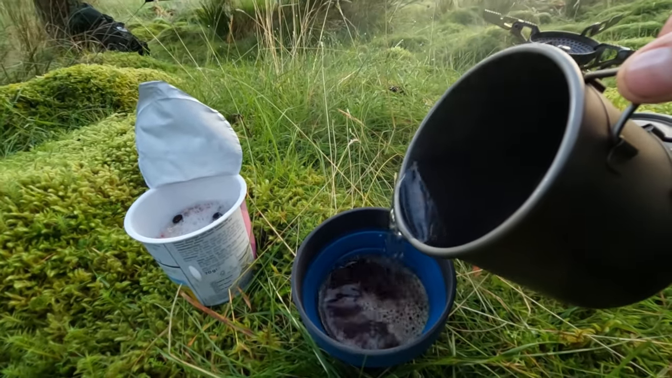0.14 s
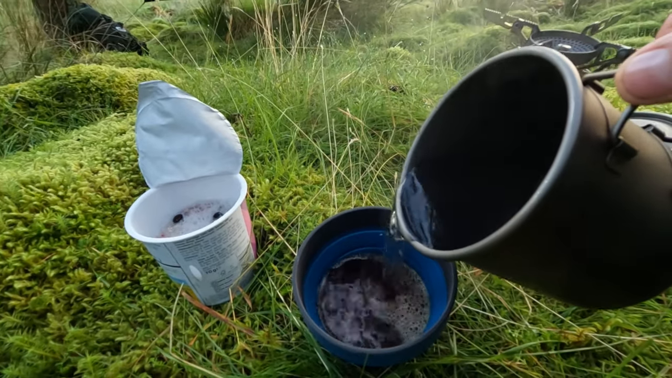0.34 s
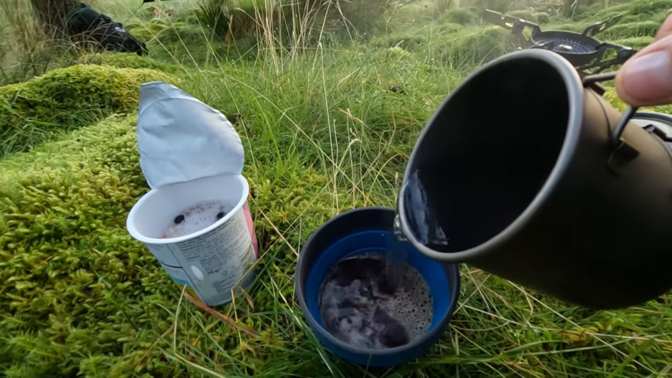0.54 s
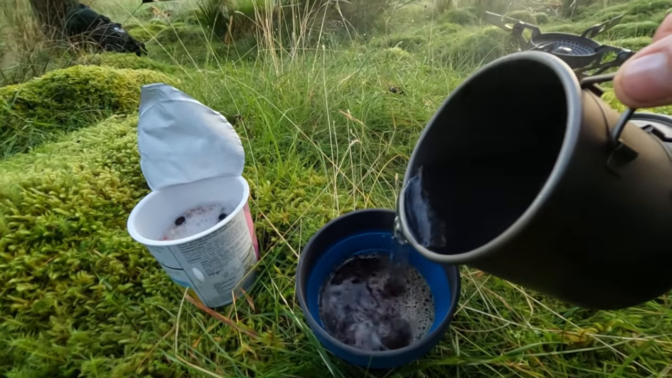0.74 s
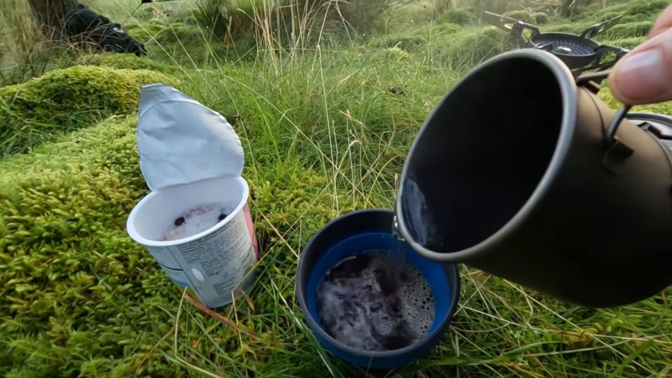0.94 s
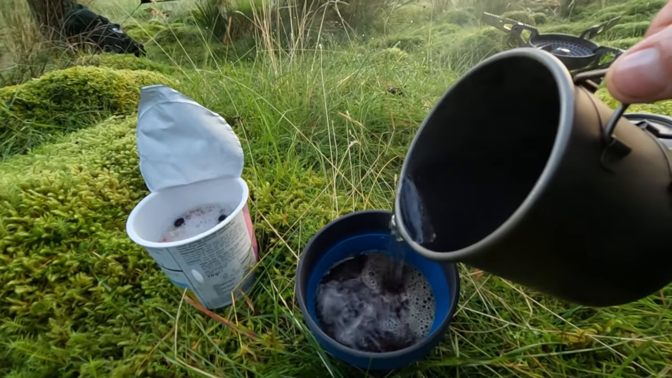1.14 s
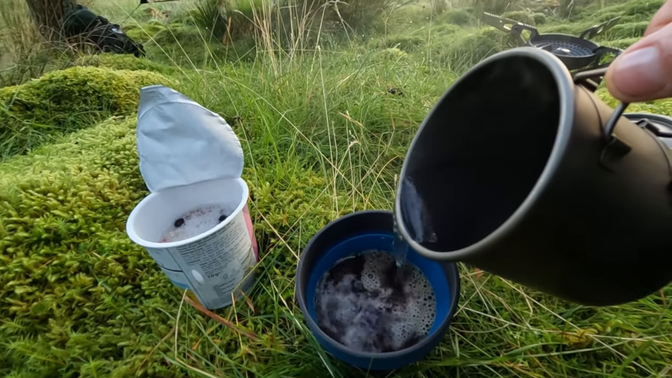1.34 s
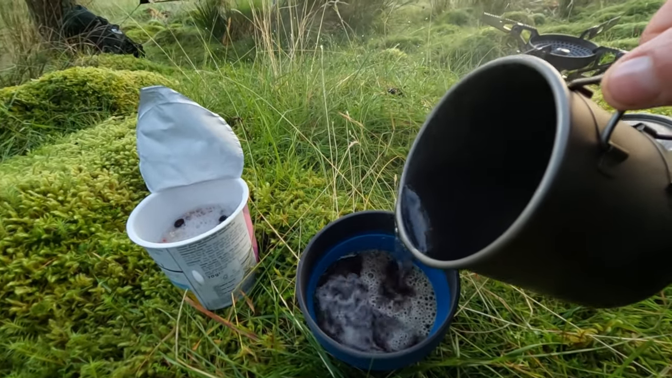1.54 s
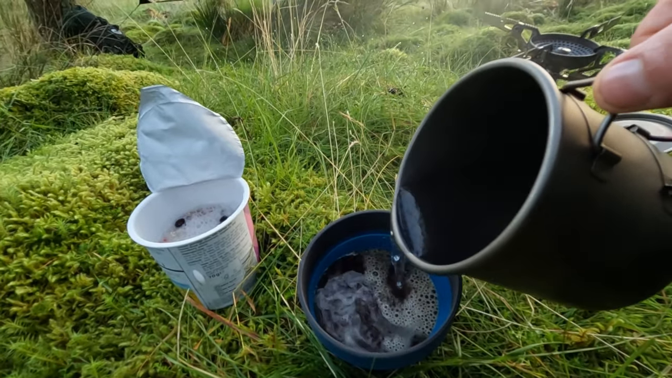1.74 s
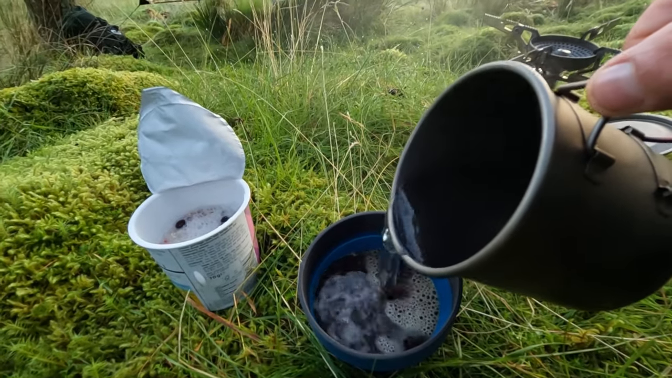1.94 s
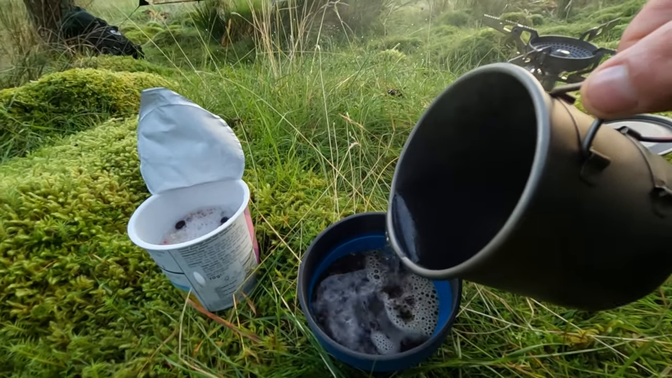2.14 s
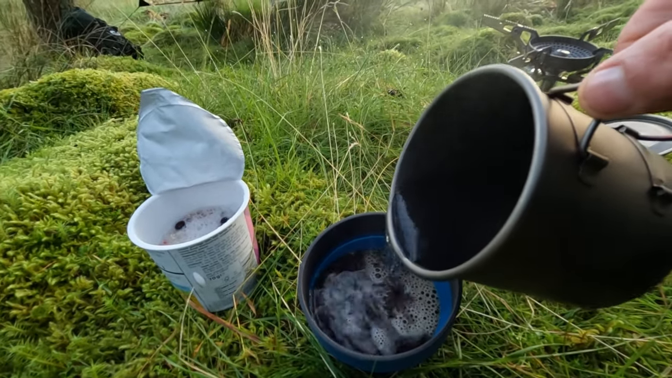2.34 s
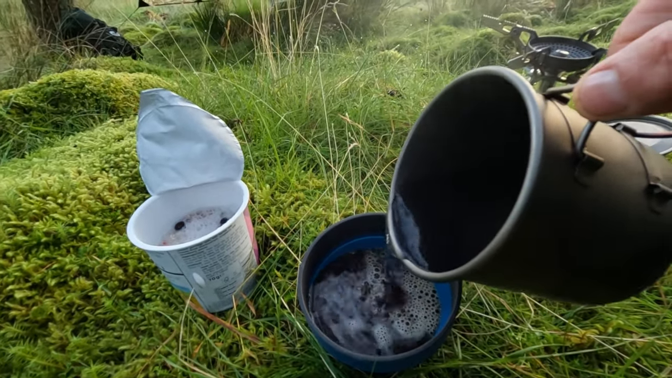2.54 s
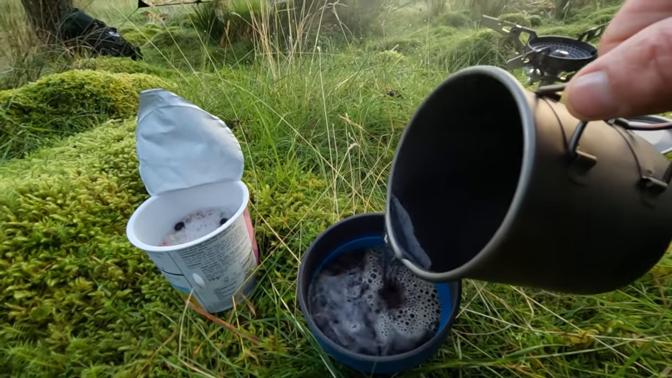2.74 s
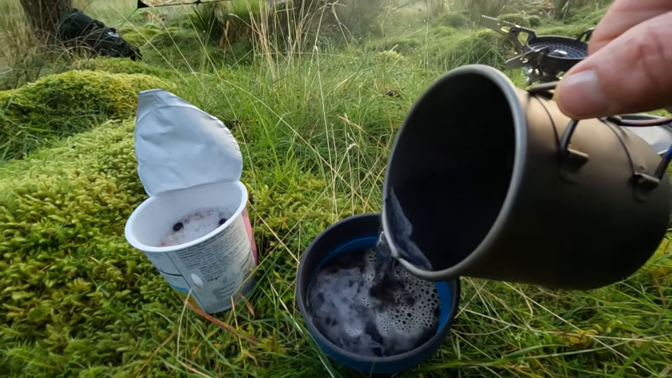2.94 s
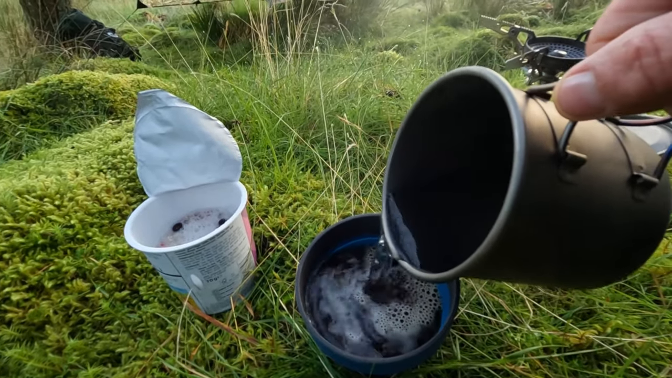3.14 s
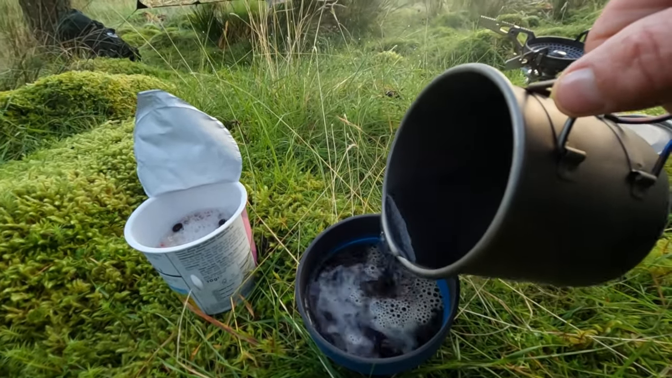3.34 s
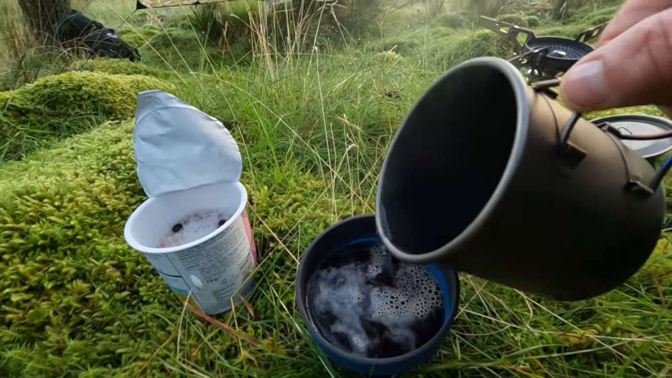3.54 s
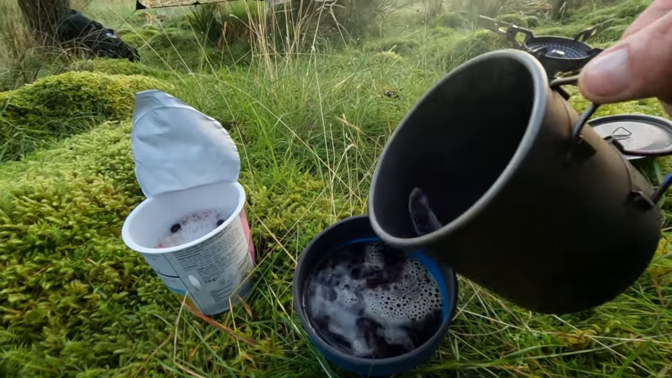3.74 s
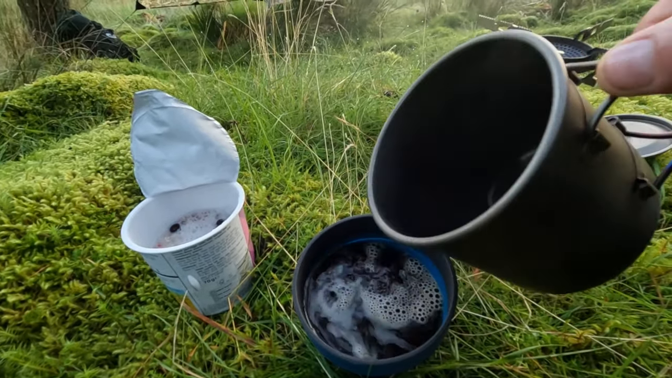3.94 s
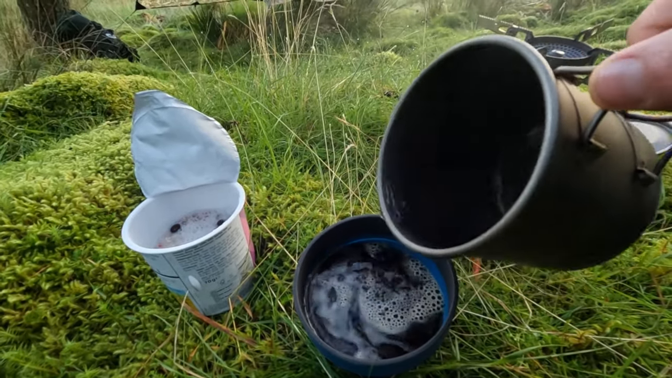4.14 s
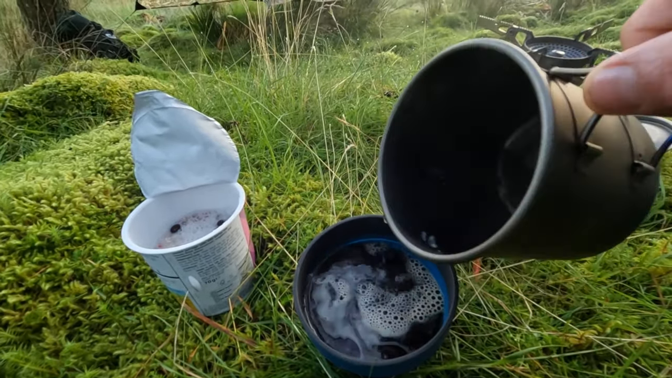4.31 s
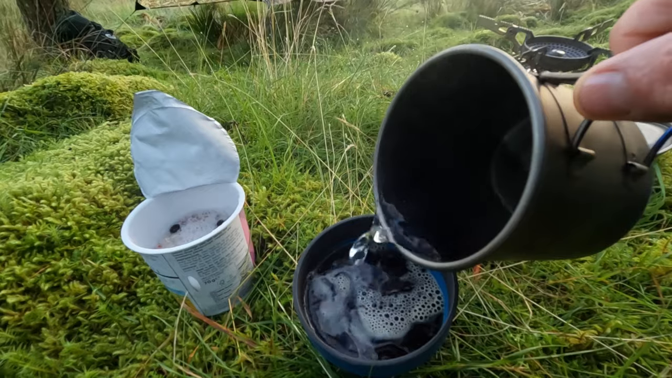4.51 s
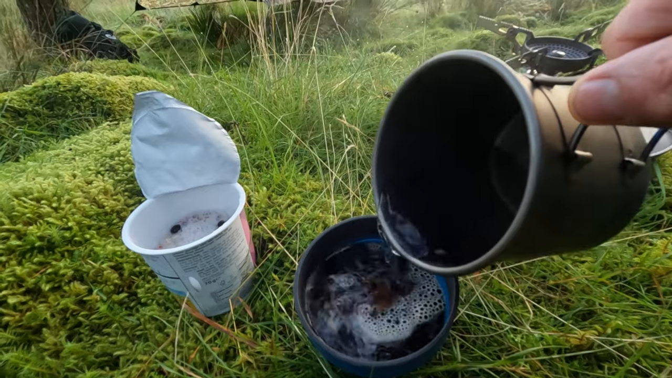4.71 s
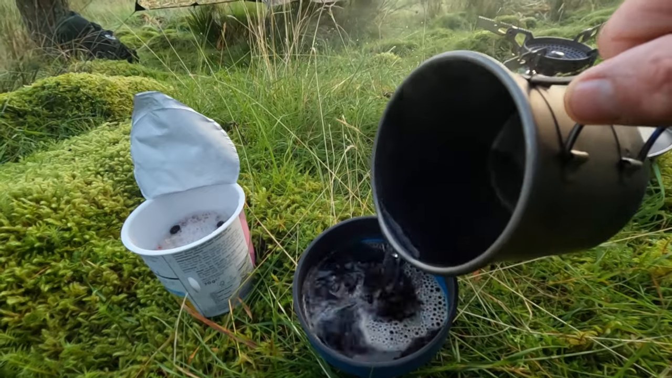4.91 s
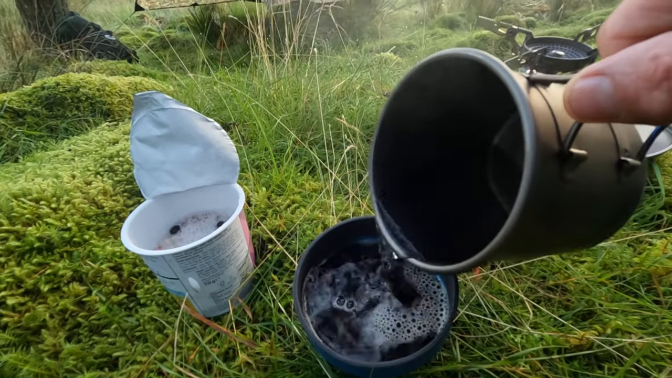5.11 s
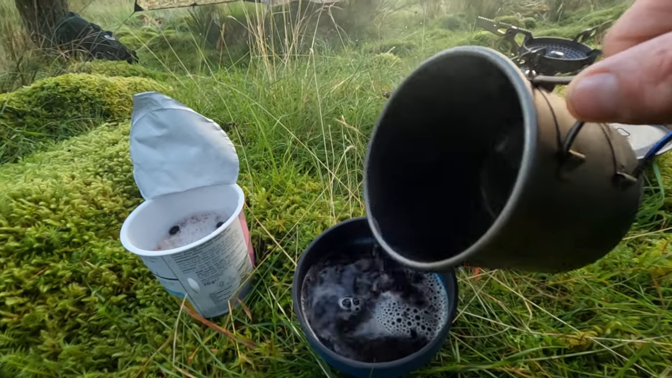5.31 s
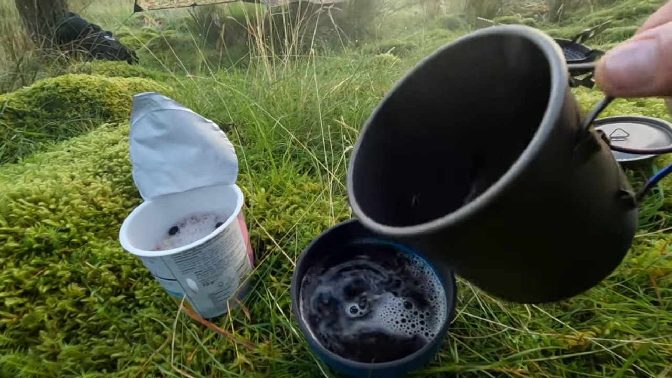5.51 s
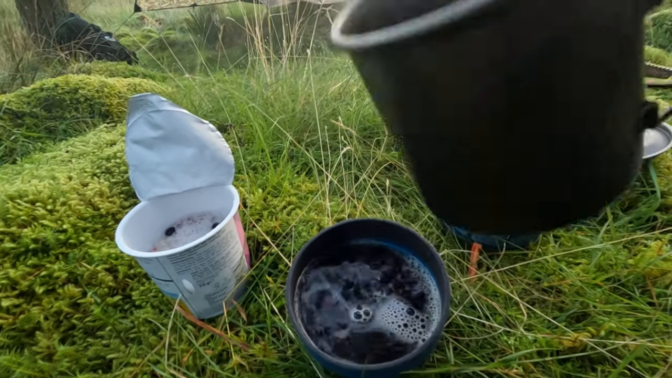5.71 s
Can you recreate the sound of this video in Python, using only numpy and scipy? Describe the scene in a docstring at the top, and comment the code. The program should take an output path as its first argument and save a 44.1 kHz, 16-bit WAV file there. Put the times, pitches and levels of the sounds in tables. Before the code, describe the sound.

Close up on a quiet hillside, an uneven trickle of water plops and gurgles into a cup of coffee, its hollow tone rising slightly as the cup fills. Soft puffs of wind brush the microphone early on. After a brief gap with faint drips, a second, shorter pour splashes in. The froth fizzes gently, and the thin metal pot lands with a light scraping clink.

```python
"""Hot water dribbles from a small metal pot into a plastic cup of coffee standing in moss, in two close pours.
Each gulp of the broken stream slaps the surface, traps a bubble that rings for a few cycles and booms the
air in the cup. Lighter drops and splashes fall between the gulps, the froth ticks, and at the end the pot
is set down with a scrape and a ring. The hillside hushes far off and a breeze brushes the microphone."""
import sys
import numpy as np
from scipy import signal
from scipy.fft import rfft, irfft, next_fast_len
from scipy.io import wavfile
from scipy.ndimage import uniform_filter1d, map_coordinates

SR = 44100
rng = np.random.default_rng(int(sys.argv[2]) if len(sys.argv) > 2 else 0)


def wav_out(sig):
    """Save sig, one row per channel (or a flat mono array), as 16-bit PCM at SR to the path in sys.argv[1]."""
    wavfile.write(sys.argv[1], SR, np.round(np.clip(np.atleast_2d(sig).T, -1, 1) * 32767).astype(np.int16))


N = 258426

# The big plops: start_s, level_db, pitch_hz, boom_offset_db, slap_offset_db, ring_cycles
GULPS = [(0.012, -23, 1710.0, -13.5, -28, 4.2), (0.0383, -21.5, 2130, -44, -23, 4.3),
         (0.0607, -23, 1490, -11.5, -9.5, 4.9), (0.0731, -27, 2460.0, -14.5, -49, 6.8),
         (0.1392, -26, 1360, -15, -39, 6.7), (0.151, -26, 1660.0, -10, -19, 6.5),
         (0.1578, -26, 1350, -11.5, -21, 8.7), (0.171, -21.5, 1430, -13, -27, 3.7),
         (0.1922, -27.5, 1620.0, -15, -15, 5.2), (0.2208, -19.5, 2150, -44, -25, 3.1),
         (0.3231, -21.5, 1526, -16, -21, 3.6), (0.355, -22.5, 2080.0, -19, -20, 2.5),
         (0.3685, -27.5, 1770.0, -44, -15, 7.5), (0.4842, -30.5, 1490.0, -11, -28, 4.6),
         (0.5443, -31.5, 1530, -8, -14, 5.8), (0.593, -27.5, 1780.0, -13, -14, 2.4),
         (0.6264, -28.5, 1900.0, -44, -10.5, 2.4), (0.6752, -28.5, 1560, -26, -18, 9.1),
         (0.6998, -20.5, 1370, -10, -23, 5.9), (0.7244, -24.5, 1610, -7, -36, 5.2),
         (0.7677, -17.5, 2030, -22, -25, 3.6), (0.8171, -22.5, 1860.0, -16.5, -26, 2.14),
         (0.9, -28, 1670.0, -13, -15, 4.8), (0.9122, -29.5, 1872, -11, -17, 21),
         (0.981, -28, 1640.0, -9, -19, 3.2), (1.0346, -29.5, 1430, -9.5, -8, 7.1),
         (1.0542, -22, 2260.0, -44, -29, 2.5), (1.106, -16.5, 2510, -18.5, -16.5, 4.8),
         (1.174, -24.5, 1610, -16, -16, 3.2), (1.353, -24, 1440, -23, -37, 6.8),
         (1.6003, -34, 1460.0, -44, -9, 7.1), (1.7119, -29, 1370.0, -18, -8.5, 14),
         (1.8224, -20.5, 1800, -13.5, -21, 5.4), (1.87, -28, 1690, -46, -18, 4.7),
         (1.8954, -23, 1416, -8, -14, 15), (1.9157, -18, 2000.0, -21, -24, 3.9),
         (2.0056, -25, 1470, -16, -26, 10.9), (2.0177, -25.5, 1640, -15, -22, 9.5),
         (2.157, -26, 2050.0, -44, -21, 3.6), (2.1816, -16, 1820, -18, -33, 4.2),
         (2.208, -27, 1770, -44, -21, 6.5), (2.2807, -17.5, 1750, -20, -28, 5.9),
         (2.2891, -22.5, 1760.0, -22, -25, 8), (2.6135, -26.5, 1970, -44, -26, 9.8),
         (2.8387, -24.5, 2000.0, -42, -20, 2.2), (2.9682, -24, 2210, -44, -37, 6.5),
         (3.023, -22, 2230.0, -20, -17, 2.96), (3.1835, -15.5, 2350, -36, -38, 2.6),
         (3.2144, -27, 1730, -18, -40, 18), (3.2573, -26.5, 2030, -17, -49, 8.2),
         (3.3207, -26, 1670.0, -21, -49, 12.9), (3.3997, -25.5, 1930.0, -26, -18, 9.3),
         (3.4219, -28.5, 2000.0, -16, -49, 7), (3.4326, -23, 1720, -23, -34, 10.5),
         (3.4459, -18, 1960, -21, -26, 4.3), (3.4722, -20, 1740, -25, -28, 8.4),
         (3.5313, -28.5, 1740, -28, -27, 15), (3.6396, -29, 1990, -44, -22, 10),
         (3.648, -26, 2045, -44, -23, 12), (3.6745, -22.5, 1700, -15, -26, 7.9),
         (3.7017, -12, 1920, -28, -13.5, 6.2), (3.7218, -15.5, 2060.0, -20, -18, 4),
         (3.7639, -10, 1680, -23, -21.5, 7.5), (4.6737, -21, 4670, -44, -19, 36),
         (4.693, -2.5, 1560, -9, -21.5, 2.3), (4.7074, -23.5, 2370, -30, -10.5, 7.1),
         (4.714, -35, 1850, -44, -1, 11.5), (4.7312, -34, 3970, 0, -8, 21),
         (4.7395, -27.5, 1720.0, -44, -8, 7.3), (4.7676, -22, 2170, -44, -11, 17.4),
         (4.779, -29, 2020.0, -44, -7, 8.4), (4.7854, -29, 1910.0, -44, -9, 5.7),
         (4.805, -17, 1990, -38, -27, 12), (4.8272, -12.5, 2380, -33, -19, 5.3),
         (4.8964, -17.5, 1680, -24, -23, 11.7), (4.9721, -9.5, 2280, -14.5, -18, 7),
         (4.9819, -25.5, 2190.0, -28, -16, 18), (5.0001, -19, 1740, -44, -19, 9.4),
         (5.0295, -27, 2100.0, -44, -16, 5.0), (5.0487, -27, 2400.0, -23, -18, 9.0),
         (5.0677, -26, 2110, -44, -17, 22), (5.0815, -19.5, 1970, -44, -29, 10),
         (5.1104, -27.5, 2590.0, -44, -15, 7.3), (5.1263, -22, 2100, -36, -26, 9.4),
         (5.1365, -30, 2370.0, -44, -28, 6.4), (5.1797, -16.5, 1900, -34, -32, 10.4),
         (5.1982, -23, 2270, -32, -35, 12), (5.2396, -17, 1830, -30, -56, 8.8),
         (5.2926, -17.5, 1460, -15, -40, 6.6), (5.3127, -26, 2250, -18, -26.5, 20),
         (5.3334, -25, 1560, -44, -11.5, 5.3), (5.3601, -19, 1700, -44, -20, 9.3),
         (5.3992, -11.5, 1490, -37, -35, 13.3), (5.4162, -17, 1900, -30, -16.5, 14),
         (5.4323, -11.5, 1730, -28, -23, 8.4), (5.45, -24, 2030, -44, -19, 11),
         (5.4672, -17.5, 2270, -46, -18, 8.6)]
# Boom of the air above the coffee, rising as the cup fills: time_s, pitch_hz
CUP_AIR = [(0, 564), (4.7, 747), (5.86, 710)]
# The cup's hollow note: time_s, pitch_hz, offset_db
HOLLOW_NOTE = [(0, 1183, -2.5), (2.2, 1263, -7.5), (5.86, 1300, -4)]
# Bright EQ for the slaps and the froth's hiss: freq_hz, gain_db
SPLASH_EQ = [(300, -23), (2200, 12.5), (4800, 0), (6000, -5), (7100, -2), (8000, -12), (12000, -16.5),
             (16000, -9)]


def gulps():
    """Each gulp slaps, pushes the surface, traps a ringing bubble and sets the cup booming."""
    start_s, level_db, pitch_hz, boom_db, slap_db, cycles = np.transpose(GULPS)
    glide_jitter, pitch_jitter, level_jitter = rng.standard_normal((len(start_s), 3)).T
    ring = bubbles(pitch_hz, np.maximum(cycles, 1) / pitch_hz, glide=-0.2 + 0.12 * glide_jitter)
    t = np.arange(ring.shape[1]) / SR

    spray = rng.standard_normal(ring.shape) * decay(t, t60_s=0.01)
    spray = signal.sosfilt(signal.butter(3, 3500, fs=SR, output="sos"), spray)  # heavy drops: dull
    push_s = 0.000085
    push = 0.49 * np.e * t / push_s * np.exp(-t / push_s)
    cushion = amp(-1.5 * start_s)[:, None]  # building froth softens the push and the spray
    body = in_cup(placed(start_s, level_db, ring + cushion * (push + 0.37 * spray)))

    air_hz = np.interp(start_s, *np.transpose(CUP_AIR))
    boom = bubbles(air_hz, 11 / air_hz) * attack(t, rise_s=0.00042)
    tail = amp(-24.5) * decay(t, t60_s=0.099) * np.sin(2 * np.pi * 952 * t)
    booms = placed(start_s, level_db + boom_db, boom + tail)
    booms = filtered(booms, lambda hz: highpass(hz, 350) ** 2)

    note_hz, note_db = (curve[(start_s * SR).astype(int)] for curve in curves(HOLLOW_NOTE))
    note_hz = note_hz * np.exp(0.029 * pitch_jitter)
    note_db = level_db + note_db + 0.44 * boom_db + 2 * level_jitter  # more boom, more hollow note
    notes = placed(start_s, note_db, bubbles(note_hz, 14 / note_hz) * attack(t, rise_s=0.0011))

    burst = rng.standard_normal(ring.shape) * decay(t, t60_s=0.0075)
    slaps = equalised(placed(start_s, level_db + slap_db, burst), SPLASH_EQ)
    slaps = filtered(slaps, lambda hz: 1.6 * highpass(hz, 5000))  # thin, bright spits
    return body + booms + slaps + notes


# Resonances of the cup's walls and rim: centre_hz, width_hz, gain_db
CUP_WALLS = [(1167, 229, 4), (1623, 475, -3.5), (2160, 350, -4.5), (2725, 270, -3)]


def in_cup(x):
    """The cup walls ring briefly after every splash and pass nothing low."""
    def response(hz):
        walls = sum(amp(db) * resonance(hz, centre, width) for centre, width, db in CUP_WALLS)
        direct = 0.59 / (1 + 1j * hz / 5000) ** 2
        low_cut = hz ** 3 / (800 ** 3 + hz ** 3)
        delay = np.exp(-2j * np.pi * hz * 0.00015)
        gap = notch(hz, centre_hz=950, width_hz=250, floor=0.16)  # air and wall cancel here
        return gap * low_cut * delay * (direct + walls)
    return filtered(x, response)


# Lighter drops beside the stream: start_s, level_db, pitch_hz
LIGHT_DROPS = [(0.089, -25, 4060), (0.11, -31, 3000), (0.127, -30, 1520), (0.1376, -25, 2210),
               (0.1554, -27, 2370), (0.2179, -23, 3020), (0.238, -30, 1950), (0.2458, -28, 1640),
               (0.2525, -30.5, 1730), (0.3435, -32, 1890), (0.3857, -27, 2360), (0.4908, -30, 3180),
               (0.529, -32, 1780), (0.599, -31, 2830), (0.638, -32, 1760), (0.6503, -27.5, 1570),
               (0.6624, -33, 2030), (0.7115, -26, 1630), (0.752, -32, 2670), (0.7782, -32, 1780),
               (0.7886, -29, 1680), (0.8035, -29, 1620), (0.8891, -28, 2000), (1.0904, -34, 1510),
               (1.1044, -28, 2010), (1.117, -26, 1680), (1.1777, -28.5, 1660), (1.2086, -33, 1960),
               (1.3757, -29, 1710), (1.4132, -27, 1820), (1.7598, -33, 1630), (1.7708, -29, 1750),
               (1.827, -29, 2850), (1.9128, -26.5, 2210), (1.9813, -30, 1780), (2.223, -28.5, 1930),
               (2.309, -27.5, 2320), (2.379, -27.5, 1970), (2.4746, -31.5, 1950), (2.6179, -32, 1810),
               (3.0043, -30, 2530), (3.0487, -29.5, 1900), (3.0675, -26, 1780), (3.118, -31.5, 1770),
               (3.17, -28, 2650), (3.2882, -28, 2740), (3.354, -29.5, 1810), (3.7007, -26, 1870),
               (4.7638, -25, 2000), (4.8249, -26, 2370), (4.8853, -25.5, 1900), (5.0656, -30, 2350),
               (5.3707, -24, 1780), (5.3891, -31, 1880), (5.4418, -20.5, 3090)]


def drops():
    """Each drop traps a small bubble that slides down in pitch, and wakes the hollow note a little."""
    start_s, level_db, pitch_hz = np.transpose(LIGHT_DROPS)
    glide = -0.26 + 0.05 * rng.standard_normal(len(start_s))
    ring = bubbles(pitch_hz, 7.3 / pitch_hz, glide, length_s=0.03)
    note_hz = curves(HOLLOW_NOTE)[0][(start_s * SR).astype(int)]
    note = bubbles(note_hz, 14 / note_hz, length_s=0.03)
    return in_cup(placed(start_s, level_db, ring)) + placed(start_s, level_db - 13.5, note)


# Stray drips in the pause: start_s, level_db
PAUSE_DRIPS = [(3.914, -39), (4.158, -38.5), (4.379, -44), (4.617, -40.5)]


def drips():
    """Single drips make faint round plips between the pours."""
    start_s, level_db = np.transpose(PAUSE_DRIPS)
    pitch_hz = np.full(len(start_s), 1120)
    return placed(start_s, level_db, bubbles(pitch_hz, 14 / pitch_hz))


# Fader ride of the stream through both pours: time_s, level_db
STREAM_LEVEL = [(0, -49.5), (.45, -52.5), (.75, -50.5), (1.2, -58), (2.1, -55), (2.9, -59), (3.1, -56.5),
                (3.7, -53), (3.8, -66), (4.6, -71), (4.7, -56.5), (5.45, -55), (5.52, -68), (5.86, -61)]


def splashes():
    """Small splashes fill in between the gulps; spatter on the bare walls fades as froth builds."""
    stream_db, = curves(STREAM_LEVEL)
    small = amp(stream_db) * unit(in_cup(bubble_cloud(330, 1020, 4230, cycles=7.5, spread=2.5)))
    spatter_db = stream_db - 7 - 7.4 * np.arange(N) / SR
    spatter = amp(spatter_db) * bubble_cloud(300, 3100, 5700, cycles=14, spread=6.5)
    return small + equalised(spatter, [(5300, 0.5), (6300, -11)])


def froth():
    """Bursting froth ticks and hisses, a little more in a strong flow, and swells as the pot lifts away."""
    stream_db, = curves(STREAM_LEVEL)
    usual_stream_db, swell_start_s, swell_db_per_s = -57.5, 5.16, 12.5
    swell_db = swell_db_per_s * np.maximum(np.arange(N) / SR - swell_start_s, 0)
    froth_db = -64 + 0.18 * (stream_db - usual_stream_db) + swell_db
    ticks = amp(froth_db - 17) * bubble_cloud(410, 10800, 17000, cycles=3.2, spread=7.5)
    hiss = amp(froth_db + wobble(33)) * unit(noise(SPLASH_EQ))
    return ticks + hiss


# Fader ride of the burble: time_s, level_db
BURBLE_LEVEL = [(0, -64), (2.45, -70), (2.65, -58.5), (2.95, -59.5), (3.15, -79), (5.86, -68)]


def burble():
    """Low bubbles burble softly under the stream, with the deep bass rolled off."""
    level_db, = curves(BURBLE_LEVEL)
    cloud = bubble_cloud(250, 277, 640, cycles=5.3, spread=4)
    return amp(level_db) * equalised(cloud, [(100, -51), (240, -1)])


# The pot touches the stove: start_s, level_db
POT_HITS = [(5.627, -48)]
# Partials of the thin metal: pitch_hz, level_db, t60_s
POT_PARTIALS = [(1960, -3, 0.33), (2650, -4, 0.51), (3950, -13, 0.75), (5190, -2.5, 0.17),
                (6320, -3, 0.069), (11570, -13, 0.072)]
# Rasp of metal on metal: freq_hz, gain_db
SCRAPE_EQ = [(300, -46.5), (1500, -12), (5500, 6.5), (6500, 1), (7500, -7.5), (16000, -24)]


def pot():
    """The pot lands with a short scrape and its thin metal rings unevenly."""
    t = np.arange(SR // 4) / SR
    ring = 0
    for pitch_hz, partial_db, t60_s in POT_PARTIALS:
        flutter_db = 1.5 * wobble(54.3)[:len(t)]
        ring += amp(partial_db + flutter_db) * decay(t, t60_s) * np.sin(2 * np.pi * pitch_hz * t)
    scrape = 3 * decay(t, t60_s=0.081) * noise(SCRAPE_EQ)[:len(t)]
    start_s, level_db = np.transpose(POT_HITS)
    return placed(start_s, level_db, (ring + scrape) * attack(t, rise_s=0.0012))


def air_thump():
    """One soft, low push of air on the microphone."""
    peak_s, pitch_hz, width_s = 1.65, 104, 0.007
    t = np.arange(N) / SR - peak_s
    return -amp(-48) * np.cos(2 * np.pi * pitch_hz * t) * np.exp(-0.5 * (t / width_s) ** 2)


# Puffs of breeze: peak_s, level_db, fall_20db_s
PUFFS = [(.15, -58, 0.02), (.55, -77, 0.5), (.75, -63.5, 0.15), (1.2, -69, 0.17), (1.6, -64, 0.05),
         (1.74, -64, 0.16)]
# Wind rumble on the microphone: freq_hz, gain_db
RUMBLE_EQ = [(12, -22.5), (25, 3), (40, 9.5), (60, 3), (105, 6.5), (140, -2), (290, -120)]


def breeze():
    """Moving air buffets the microphone: a lumpy rumble in puffs that swell and fall alike."""
    peak_s, level_db, fall_s = np.transpose(PUFFS)[:, :, None]
    puffs = amp(level_db - 20 * np.abs(np.arange(N) / SR - peak_s) / fall_s).sum(axis=0)
    calm = amp(-91.5)
    rumble = unit(amp(2 * wobble(39.92)) * noise(RUMBLE_EQ))
    return (calm + puffs) * rumble


# Tone of the distant ambience bed: freq_hz, gain_db
HILLSIDE_EQ = [(60, -75), (112, -29), (145, -3.5), (190, 0.5), (250, -4), (295, -6.5), (410, -2),
               (950, -3.5), (1200, -3.5), (1500, -6), (3100, -16.5), (4900, -19.5), (8000, -34.5),
               (10400, -74.5), (17000, -120)]


def hillside():
    """A far hush whose tone shifts in patches while its level drifts slowly."""
    spectrogram = signal.stft(rng.standard_normal(N + 512), nperseg=512)[2]
    patches = uniform_filter1d(rng.standard_normal(spectrogram.shape), 6, axis=0)
    patches = uniform_filter1d(patches, 8, axis=1)
    hush = signal.istft(spectrogram * amp(1.6 * unit(patches)), nperseg=512)[1][:N]
    return amp(-55.5 + 1.5 * wobble(0.43)) * unit(equalised(hush, HILLSIDE_EQ))


def bubbles(pitch_hz, t60_s, glide=0, length_s=0.06):
    """Damped sines with a soft start, one per row; glide bends the pitch as the cavity changes shape."""
    t = np.arange(int(length_s * SR)) / SR
    pitch_hz, t60_s, glide = (np.reshape(x, (-1, 1)) for x in (pitch_hz, t60_s, glide))
    turns = pitch_hz * t * (1 + glide * np.minimum(t / t60_s, 1))
    return np.sin(2 * np.pi * turns) * decay(t, t60_s) * attack(t, rise_s=0.00013)


def bubble_cloud(per_second, low_hz, high_hz, cycles, spread):
    """Random bubbles, many small and a few large, at an overall rms of 1."""
    when, pitch, size, bend = rng.random((int(per_second * N / SR), 4)).T
    pitch_hz = low_hz * (high_hz / low_hz) ** pitch
    level_db = -spread * np.log(size + 0.03)
    rings = bubbles(pitch_hz, cycles / pitch_hz, glide=bend - 0.7, length_s=1.5 * cycles / low_hz)
    return unit(placed(when * N / SR, level_db, rings))


def placed(start_s, level_db, sounds):
    """Mixes short sounds, each at its own time and level."""
    rows = amp(level_db)[:, None] * sounds
    at = np.round(start_s * SR).astype(int)[:, None] + np.arange(rows.shape[1])
    return np.bincount(at.ravel(), rows.ravel(), N + SR)[:N]


def amp(db):
    return 10 ** (np.asarray(db) / 20)


def unit(x):
    return x / np.sqrt(np.mean(x ** 2) + 1e-20)


def attack(t, rise_s):
    return 1 - np.exp(-t / rise_s)


def decay(t, t60_s):
    return amp(-60 * t / t60_s)


def curves(rows):
    """Automation: one value per sample for each column after the time."""
    time_s, *columns = np.transpose(rows)
    return [np.interp(np.arange(N) / SR, time_s, column) for column in columns]


def wobble(rate):
    """A smooth random curve, rate knots a second."""
    return map_coordinates(rng.standard_normal(int(N * rate / SR) + 4), [np.arange(N) * rate / SR])


def filtered(x, response):
    """Applies a complex frequency response."""
    size = next_fast_len(N + SR // 2)
    return irfft(rfft(x, size) * response(np.fft.rfftfreq(size, 1 / SR)), size)[..., :N]


def eq_gain(eq, hz):
    """Linear gain between EQ points on a log frequency axis."""
    freq_hz, gain_db = np.transpose(eq)
    return amp(np.interp(np.log(hz + 1), np.log(freq_hz + 1), gain_db))


def equalised(x, eq):
    return filtered(x, lambda hz: eq_gain(eq, hz))


def noise(eq):
    return equalised(rng.standard_normal(N), eq)


def highpass(hz, corner_hz):
    return 1j * hz / (corner_hz + 1j * hz)


def resonance(hz, centre_hz, width_hz):
    return 1j * hz * width_hz / (centre_hz ** 2 - hz ** 2 + 1j * hz * width_hz)


def notch(hz, centre_hz, width_hz, floor):
    return 1 - (1 - floor) * resonance(hz, centre_hz, width_hz)


# Stereo width, the EQ of the side signal: freq_hz, gain_db
SIDE_EQ = [(60, -27), (2000, -72), (4000, -32.5), (10500, -13.5), (12300, -2), (13500, 2)]


def scene():
    """The mono mix, spread between the microphone's two ports mostly in the treble."""
    water = gulps() + drops() + drips() + splashes() + froth() + burble()
    mid = water + pot() + air_thump() + hillside() + breeze()
    # the right port hears more treble
    lean = filtered(mid, lambda hz: -0.65 * eq_gain(SIDE_EQ, hz) * np.exp(-0.4j))
    # scattered treble reaches each port by its own path
    shimmer = 0.8 * equalised(mid * wobble(150), SIDE_EQ)
    side = lean + shimmer
    return np.array([mid + side, mid - side])


def record(dry):
    """The microphone housing puts a notch and a peak in the treble; the very top is cut off."""
    def response(hz):
        dip = notch(hz, centre_hz=9050, width_hz=1500, floor=0.08)
        peak = 1 + 2.5 * resonance(hz, centre_hz=12000, width_hz=2200)
        high_cut = (hz < 13800) / (1 + (hz / 12400) ** 24)
        return dip * peak * high_cut
    return filtered(dry, response)


dry = scene()
out = record(dry)
wav_out(out)
```